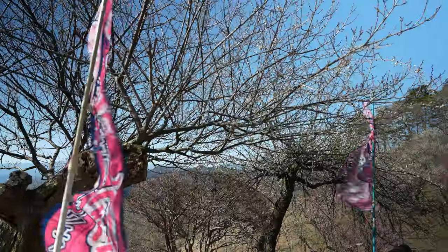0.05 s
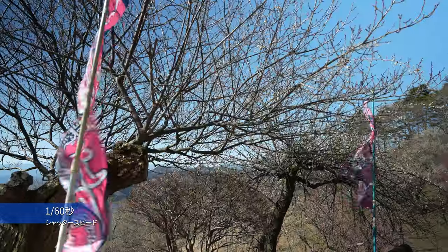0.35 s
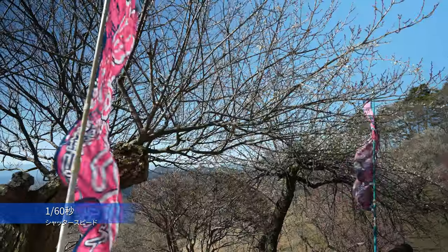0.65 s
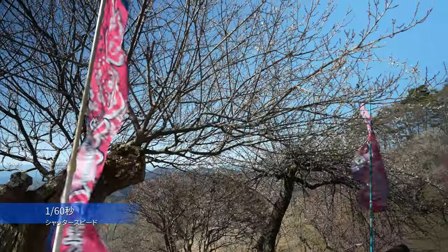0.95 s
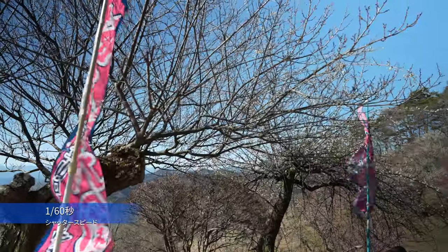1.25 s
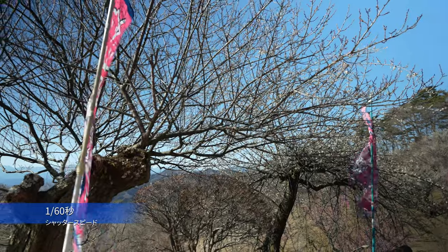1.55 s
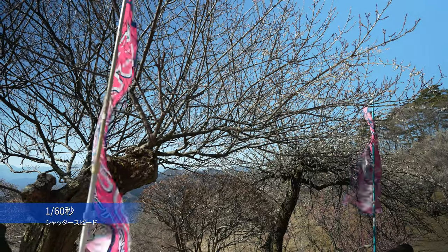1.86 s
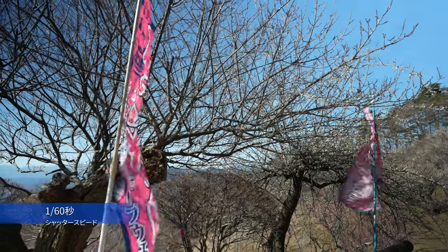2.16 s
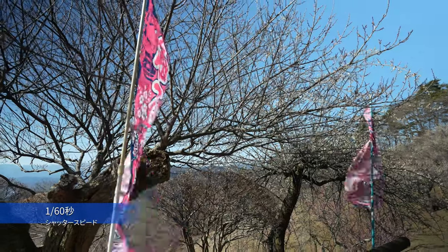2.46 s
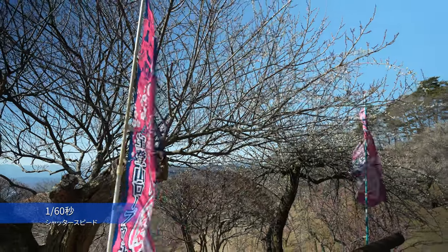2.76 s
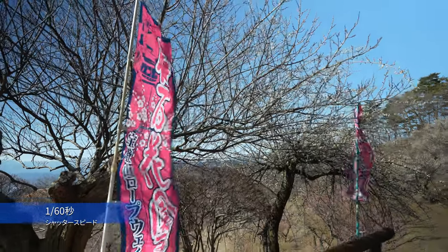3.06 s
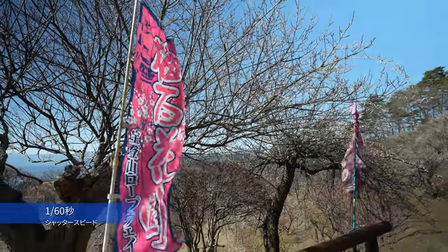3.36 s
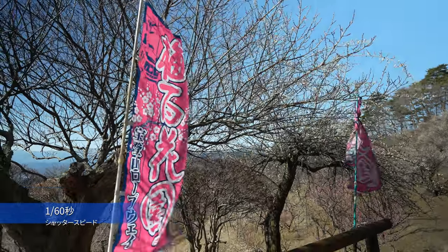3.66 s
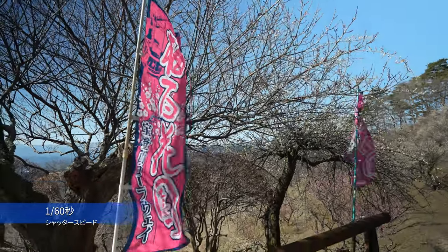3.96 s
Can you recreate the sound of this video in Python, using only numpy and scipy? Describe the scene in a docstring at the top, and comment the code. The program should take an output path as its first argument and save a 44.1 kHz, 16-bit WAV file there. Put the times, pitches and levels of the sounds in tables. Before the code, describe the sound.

A cloth banner flaps irregularly in gusty wind, with two thin bird calls.

```python
"""A tall cloth banner flaps on its pole on a windy hillside. Each flap is a dull thump of the sheet pulling
taut, a snap of its edge and a crackle of folds. Wind hisses in bare branches and buffets the microphone. After
the first moment the sound drops away, then fades back in, lows first. Birds whistle faintly far off, and near
the end a small bird calls twice."""
import sys
import numpy as np
from scipy import signal
from scipy.fft import rfft, irfft
from scipy.io import wavfile
from scipy.ndimage import uniform_filter1d

SR = 44100
rng = np.random.default_rng(int(sys.argv[2]) if len(sys.argv) > 2 else 0)


def digitize_waveform(pressure):
    """Quantize a signal to 16-bit integers and store it at the path in sys.argv[1].

    Rows of a 2-D input are taken as channels; values are limited to [-1, 1].
    """
    field = np.atleast_2d(pressure).T
    bounded = np.clip(field, -1, 1)
    quanta = np.round(bounded * 32767).astype(np.int16)
    wavfile.write(sys.argv[1], SR, quanta)


N = 176400
T = np.arange(N) / SR
HIT_T = np.arange(int(.08 * SR)) / SR   # time within a one-shot


def from_db(db):
    """Decibels to gain."""
    return 10 ** (np.asarray(db) / 20)


def rms_one(x):
    """Scale to unit rms."""
    return x / np.sqrt(np.mean(x ** 2) + 1e-20)


def in_time(rows):
    """Turn breakpoints into one automation curve per column."""
    times, *columns = np.transpose(rows)
    return [np.interp(T, times, column) for column in columns]


def at_hz(points, hz):
    """Read a curve on a log-frequency axis."""
    freqs, values = np.transpose(points)
    return np.interp(np.log(hz + 1), np.log(freqs), values)


def pan(db):
    """Constant-power stereo gains; db is left minus right."""
    gains = from_db(np.array([[.5], [-.5]]) * db)
    return gains / np.sqrt(np.mean(gains ** 2, axis=0))


def delayed(x, lag_s):
    """The sound, arriving lag_s later."""
    return np.interp(T - lag_s, T, x)


def add(track, s, sound):
    """Drop a one-shot into a track at time s."""
    i = int(np.clip(s * SR, 0, N - 1))
    track[i:i + len(sound)] += sound[:N - i]


def drift(rate_hz):
    """Smooth random modulation of spread 1."""
    step = 40   # samples per control point
    pole = np.exp(-2 * np.pi * rate_hz * step / SR)
    noise = rng.standard_normal(N // step + 2002)
    slow = signal.lfilter([1], [1, -2 * pole, pole * pole], noise)[2000:]
    return np.interp(np.arange(N) / step, np.arange(len(slow)), rms_one(slow))


def grains(per_s, spread_db):
    """Random clicks of uneven size, in two channels."""
    sizes = from_db(spread_db * np.minimum(rng.exponential(1, N), 4))
    return (rng.random(N) < per_s / SR) * sizes * rng.standard_normal((2, N))


# Stereo width of the open air: (frequency [Hz], left-right correlation [-1 to 1])
AIR_CORRELATION = [(30, 0.92), (100, 0.97), (250, 0.98), (600, 0.74), (1200, 0.36), (2500, -0.47),
                   (6000, 0.022), (15000, -0.075)]
# Stereo tilt of the open air: (frequency [Hz], left minus right [dB])
AIR_BALANCE = [(60, 0.5), (300, -0.5), (1000, 0.5), (2500, -1.5), (5000, 0), (9000, -2.5), (14000, 2)]
def colour(pair, eq):
    """EQ two unrelated signals and spread them as mid and side to the width of the open air; rms 1."""
    hz = np.arange(N // 2 + 1) * SR / N
    mid, side = rfft(pair)
    alike = np.clip(at_hz(AIR_CORRELATION, hz), -.99, .99)
    stereo = np.sqrt(1 + alike) * mid + np.sqrt(1 - alike) * side * np.array([[1], [-1]])
    return rms_one(irfft(stereo * pan(at_hz(AIR_BALANCE, hz)) * from_db(at_hz(eq, hz)), N))


def air(eq, level_db, flicker_db, rate_hz):
    """Turbulent noise that flickers quickly about a given level."""
    noise = colour(rng.standard_normal((2, N)), eq) * from_db(flicker_db * drift(rate_hz))
    slow_power = uniform_filter1d(np.mean(noise ** 2, axis=0), size=SR // 10)
    return noise / np.sqrt(slow_power) * from_db(level_db)


# Faders of the wind bed: (time [s], body [dB], mid hiss [dB], treble hiss [dB])
WIND_LEVELS = [(0, -40.5, -58, -70), (.066, -48.5, -59, -75), (.082, -100, -110, -110),
               (.25, -80, -105, -110), (.42, -66, -75, -105), (.54, -49.5, -63, -66),
               (.62, -38.5, -48, -52), (.78, -39, -45, -55.5), (.88, -40, -57, -42.5),
               (1.08, -39, -46.5, -42.5), (1.4, -40, -46, -47), (2.1, -40.5, -52, -48.5),
               (2.45, -43, -50.5, -48.5), (2.85, -46.5, -54.5, -51.5), (3.3, -44.5, -59.5, -51),
               (3.55, -42.5, -47.5, -53), (4, -44, -51, -59.5)]
# Tone of its three layers: (frequency [Hz], relative level [dB])
BODY_EQ = [(100, -5.5), (250, 4.5), (450, -2.5), (900, -4.5), (1300, -15), (2000, -29), (4000, -59)]
MID_HISS_EQ = [(700, -0.5), (1300, -2), (1900, -0.5), (3000, -5.5), (4500, -13), (9000, -16.5)]
TREBLE_HISS_EQ = [(1800, 1), (3500, -5), (6000, -2), (9000, 0), (11000, -3.5), (16000, 0)]
def wind():
    """Wind in bare branches: a low, restless body under two layers of hiss."""
    body_db, mid_db, treble_db = in_time(WIND_LEVELS)
    body = air(BODY_EQ, body_db, flicker_db=8.0, rate_hz=8.0)
    mid_hiss = air(MID_HISS_EQ, mid_db, flicker_db=2.5, rate_hz=25)
    treble_hiss = air(TREBLE_HISS_EQ, treble_db, flicker_db=1.77, rate_hz=34)
    return body + mid_hiss + treble_hiss


# Tone of the small ripples in the sheet: (frequency [Hz], relative level [dB])
RIPPLE_EQ = [(120, -28), (300, 6.5), (900, -2), (2000, -13), (5000, -28), (15000, -47)]
def flutter():
    """The cloth ripples and rustles, riding just under the wind's body and treble hiss."""
    body_db, _, treble_db = in_time(WIND_LEVELS)
    ripples = colour(grains(per_s=260, spread_db=-5.5), RIPPLE_EQ)
    ripples = rms_one(ripples * from_db(2.5 * drift(rate_hz=9.7)))
    rustle = colour(grains(per_s=94, spread_db=-5.5), TREBLE_HISS_EQ)
    return ripples * from_db(body_db - 8) + rustle * from_db(treble_db - 11)


# Faders of the gusts on the microphone: (time [s], rumble [dB], bluster [dB])
GUST_LEVELS = [(0, -69, -35), (.066, -51, -34.5), (.082, -93, -89), (.19, -83.5, -88), (.42, -49, -44),
               (.49, -41, -31), (.62, -31.5, -29.5), (.69, -27, -29), (.78, -32, -32), (.84, -32.5, -42.5),
               (1.0, -51, -56), (1.08, -33.5, -51), (1.15, -55, -49), (1.3, -31.5, -41.5),
               (1.38, -44.5, -51), (2.47, -52, -57), (2.53, -39.5, -56), (2.72, -35, -43.5),
               (2.91, -48.5, -52), (3.03, -37.5, -53), (3.22, -39.5, -59), (3.42, -47, -71),
               (3.58, -30, -34), (3.65, -35, -47), (3.70, -25, -33.5), (3.77, -33.5, -41.5),
               (3.87, -23.5, -21), (3.94, -33.5, -27.5), (4, -33.5, -44)]
# Tone of the two gust layers: (frequency [Hz], relative level [dB])
RUMBLE_EQ = [(15, -5.5), (28, 4), (50, 7.5), (80, 4.5), (120, -2.5), (200, -13), (400, -71)]
BLUSTER_EQ = [(50, -21.5), (90, -8.5), (130, -3), (200, -3.5), (300, -7), (450, -14), (800, -33),
              (2000, -70)]
# Single strong eddies, a suction and then a push: (time [s], level [dB], frequency [Hz])
EDDIES = [(0.629, -15.5, 80), (0.686, -12, 87.5), (0.771, -14, 85.5), (3.688, -15, 132), (3.85, -12, 130),
          (3.893, -15, 164), (3.937, -12.5, 126)]
# The wind turns, so eddies cross the other way: (time [s], lag of the right channel [s])
EDDY_LAG = [(0.85, .0011), (3.6, -.0008)]
def buffeting(eddy_width_cycles=0.35):
    """Gusts hit the microphone, one side before the other: rumble, lumpy bluster and strong eddies."""
    rumble_db, bluster_db = in_time(GUST_LEVELS)
    gusts = air(RUMBLE_EQ, rumble_db, flicker_db=3.0, rate_hz=24.5)
    gusts += air(BLUSTER_EQ, bluster_db, flicker_db=5.0, rate_hz=55)
    for s, db, hz in EDDIES:
        cycles = (T - s) * hz
        swell = np.exp(-np.minimum(np.square(cycles / eddy_width_cycles) / 2, 20))
        gusts += from_db(db) * np.sin(2 * np.pi * cycles) * swell
    lag_s, = in_time(EDDY_LAG)
    return np.array([delayed(gusts[0], -lag_s / 2), delayed(gusts[1], lag_s / 2)])


def from_banner(x):
    """Sharp sounds of the banner reach the right side first, and louder."""
    return np.array([delayed(x, lag_s=0.000089), x]) * pan(db=-4.5)


# Light flicks of a loose fold: (time [s], level [dB], band centre [Hz])
FLICKS = [(0.3724, -48.5, 660), (0.451, -36.5, 814), (0.475, -47.5, 1200), (0.717, -34.5, 1200),
          (1.2025, -30.5, 1660), (1.6473, -27.5, 875), (1.774, -30.5, 790), (1.789, -31, 1220),
          (2.412, -24, 980), (2.618, -37.5, 2360), (2.776, -35.5, 830), (3.054, -43, 2220),
          (3.3113, -31.5, 626), (3.443, -29.5, 830), (3.609, -39.5, 3600), (3.644, -32.5, 1300),
          (3.7586, -35.5, 1490)]
def flicks(decay_s=0.0048, band_ratio=1.58):
    """A loose fold flicks over: a short papery burst without a thump."""
    out = np.zeros(N)
    for s, db, hz in FLICKS:
        band = signal.butter(2, [hz / band_ratio, hz * band_ratio], "band", fs=SR, output="sos")
        burst = rms_one(signal.sosfilt(band, rng.standard_normal(len(HIT_T))))
        add(out, s, from_db(db) * burst * np.exp(-HIT_T / decay_s))
    return from_banner(out)


# Slides of the cloth: (peak time [s], half length [s], level [dB], band pitch [Hz])
SWISHES = [(0.599, 0.014, -36, 1230), (0.91, 0.044, -45.5, 2730), (0.873, 0.011, -45, 12200),
           (1.025, 0.017, -39.5, 960), (1.219, 0.0054, -37, 1890), (1.512, 0.0044, -33, 800),
           (1.848, 0.014, -45, 10000), (1.866, 0.025, -48, 1810), (2.8, 0.28, -59, 2960),
           (3.37, 0.039, -45.5, 1850)]
def swishes():
    """Cloth slides on cloth: soft swells of fine grains."""
    out = np.zeros((2, N))
    for s, half_length, db, hz in SWISHES:
        band = signal.butter(2, [hz / 1.9, min(hz * 1.25, .45 * SR)], "band", fs=SR, output="sos")
        rub = signal.sosfilt(band, grains(per_s=2200, spread_db=2) + 1e-18)
        swell = np.exp(-.5 * ((T - s) / half_length) ** 2)
        out += rms_one(rub) * from_db(db) * swell
    return out


def swing(hz, decay_s):
    """A pressure swing that starts with suction and dies fast."""
    return -np.sin(2 * np.pi * hz * HIT_T) * np.exp(-HIT_T / decay_s)


# Hits of the sheet pulling taut: (time [s], thump level [dB], thump pitch [Hz],
# snap level [dB], snap pitch [Hz], crackle level [dB], crackle decay [s])
FLAPS = [(0.7286, -19, 329, -12.5, 704, -44, 0.0075), (0.8287, -22.5, 286, -21.5, 780, -44, 0.02),
         (0.91, -18.5, 311, -38, 600, -38, 0.007), (1.0488, -21, 336, -10.5, 706, -28, 0.0061),
         (1.058, -23, 354, -16, 685, -27, 0.0054), (1.1636, -22.5, 292, -26, 895, -31, 0.011),
         (1.2263, -18.5, 290, -17, 617, -25, 0.0032), (1.3433, -12, 325, -15.5, 800, -28.5, 0.011),
         (1.5174, -7.5, 328, -18, 1000, -27, 0.0062), (1.6814, -18.5, 356, -11.5, 856, -27.5, 0.0034),
         (1.857, -20, 313, -27, 800, -30.5, 0.008), (2.0434, -19, 343, -9.5, 640, -32.5, 0.006),
         (2.2209, -18.5, 353, -24.5, 714, -37, 0.0084), (2.407, -27.5, 290, -28, 1130, -34.5, 0.007),
         (2.607, -20.5, 294, -23, 690, -38.5, 0.0087), (2.830, -22.5, 294, -25.5, 836, -48.5, 0.012),
         (3.726, -26, 223, -24, 700, -52, 0.0062)]
def flaps(thump_attack_s=0.00054, sag_per_s=3, snap_delay_s=0.00021, whip_gap_s=0.002836):
    """The sheet pulls taut and swings a few times, sinking in pitch; its edge snaps and whips back."""
    thumps, snaps = np.zeros(N), np.zeros(N)
    attack = 1 - np.exp(-HIT_T / thump_attack_s)
    for s, thump_db, thump_hz, snap_db, snap_hz, _, _ in FLAPS:
        gap_scatter, pitch_scatter, whip_scatter = np.exp(rng.normal(0, 0.18, 3))
        thump = swing(thump_hz / (1 + sag_per_s * HIT_T), decay_s=0.0052) * attack
        add(thumps, s, from_db(thump_db) * thump)
        bite = from_db(-19.5) * swing(hz=2300 * pitch_scatter, decay_s=0.00029)
        snap = from_db(snap_db) * (swing(snap_hz, decay_s=0.0009) + bite)
        whip = from_db(-1.5) * whip_scatter ** 2 * snap
        add(snaps, s + snap_delay_s, snap)
        add(snaps, s + snap_delay_s + whip_gap_s * gap_scatter, whip)
    soft_cloth = signal.butter(4, 3920, fs=SR, output="sos")   # rounds off the top of the snap
    return thumps * pan(db=0.5) + from_banner(signal.sosfilt(soft_cloth, snaps))


# Tone of the popping folds: (frequency [Hz], relative level [dB])
CRACKLE_EQ = [(150, -32), (400, -9.5), (900, 3.5), (1400, -5), (2200, -2.5), (3200, -11), (4300, -16),
              (8000, -21), (16000, -28)]
def crackle():
    """Folds pop open in a short run after each flap."""
    power = np.zeros(N)
    for s, *_, db, decay_s in FLAPS:
        add(power, s, from_db(db) ** 2 * np.exp(-HIT_T / decay_s))
    folds = colour(grains(per_s=3000, spread_db=1.5), CRACKLE_EQ)
    return folds * np.sqrt(power) * pan(db=-3)


# Sharp ticks of the hem: (time [s], level [dB])
HEM_TICKS = [(0.884, -27), (1.061, -22), (1.1643, -14), (1.169, -25), (1.2294, -20)]
def hem_ticks():
    """Now and then the hem gives a tiny bright click, hard right."""
    out = np.zeros(N)
    tick = 2 * swing(hz=4370, decay_s=.00008)   # peaks near 1
    for s, db in HEM_TICKS:
        add(out, s, from_db(db) * tick)
    return out * pan(db=-28)


# Notes of distant birds: (peak time [s], half length [s], pitch [Hz], level [dB])
FAR_NOTES = [(1.583, 0.0085, 4130, -52), (3.794, 0.17, 2000, -58)]
def far_birds(sag_hz_per_s=180):
    """Faint, slowly sinking whistles from far away."""
    out = np.zeros(N)
    for s, half_length, hz, db in FAR_NOTES:
        phase = 2 * np.pi * np.cumsum(hz - sag_hz_per_s * (T - s)) / SR
        swell = np.exp(-np.square((T - s) / half_length) ** 2)
        out += from_db(db) * np.sin(phase) * swell
    return out


# The small bird's glides, one list per call: (time [s], pitch [Hz], level [dB])
BIRD_CALLS = [
    [(3.492, 11300, -81), (3.512, 9980, -34), (3.526, 9500, -29), (3.546, 9630, -31), (3.553, 9700, -48),
     (3.562, 10100, -62)],
    [(3.744, 10000, -60), (3.757, 8930, -49), (3.784, 7850, -37), (3.80, 7930, -34), (3.812, 8640, -40),
     (3.83, 8700, -40)],
]
def small_bird(warble_depth_hz=120, warble_rate_hz=95, tail_t60_s=0.24, tail_db=0.5):
    """Two thin calls dip in pitch, then rise with a warble; the trees scatter them into a short tail."""
    calls = np.zeros(N)
    warble = warble_depth_hz * np.sin(2 * np.pi * warble_rate_hz * T)
    for call in BIRD_CALLS:
        hz, db = in_time(call)
        progress = (T - call[0][0]) / (call[-1][0] - call[0][0])
        hz = hz + warble * np.clip(progress, 0, 1) ** 2
        gate = (progress > 0) & (progress < 1)
        calls += np.sin(2 * np.pi * np.cumsum(hz) / SR) * from_db(db) * gate
    t = T[:SR // 2]
    trees = rng.standard_normal((2, len(t))) * from_db(-60 * t / tail_t60_s)
    tail = signal.fftconvolve(calls[None], trees, axes=1)[:, :N]
    tail = rms_one(tail) * calls.std() * from_db(tail_db)
    return calls * pan(db=-32) + tail * pan(db=-6)


def scene():
    """The mix: banner, wind and birds."""
    banner = flaps() + flicks() + crackle() + hem_ticks() + swishes() + flutter()
    return banner + wind() + buffeting() + far_birds() + small_bird()


def record(dry):
    """A steep high cut at 15.7 kHz on the master."""
    return signal.sosfilt(signal.ellip(12, .1, 80, 15700, fs=SR, output="sos"), dry)


dry = scene()
out = record(dry)
digitize_waveform(out)
```